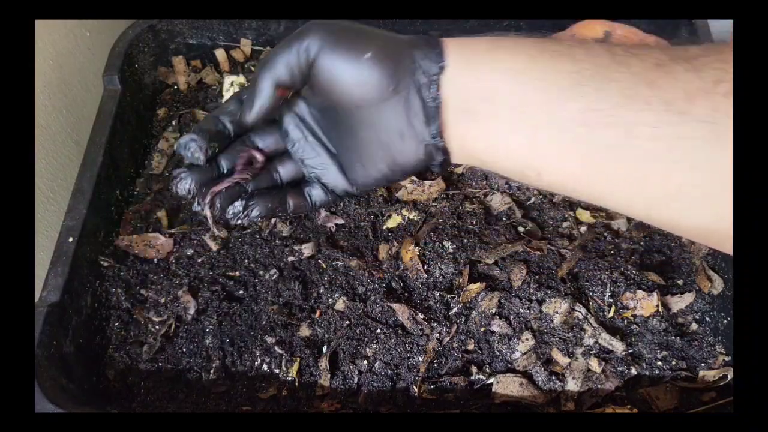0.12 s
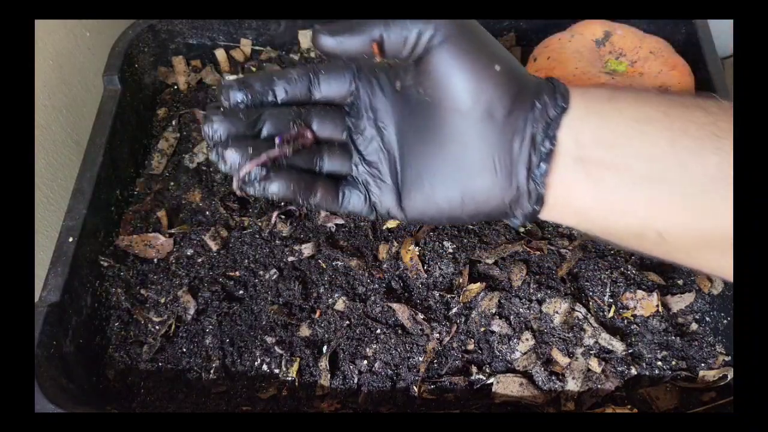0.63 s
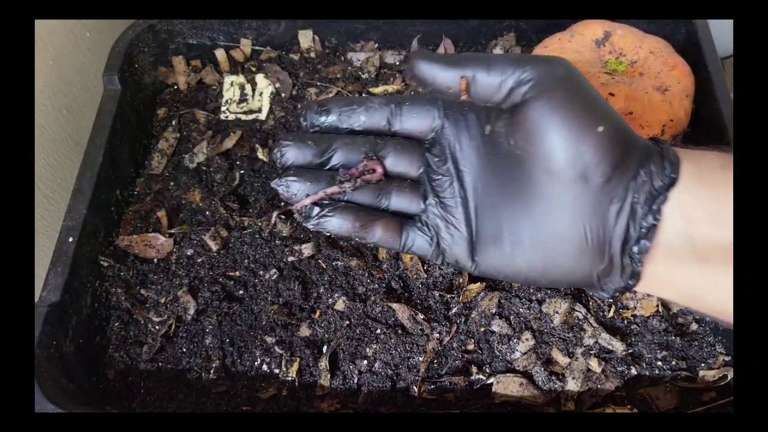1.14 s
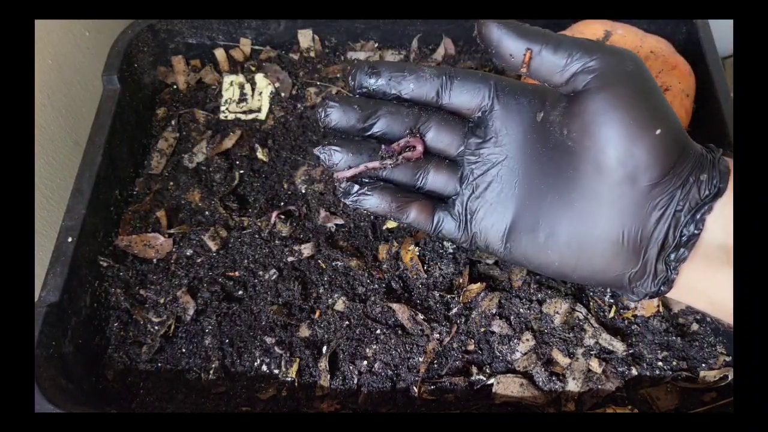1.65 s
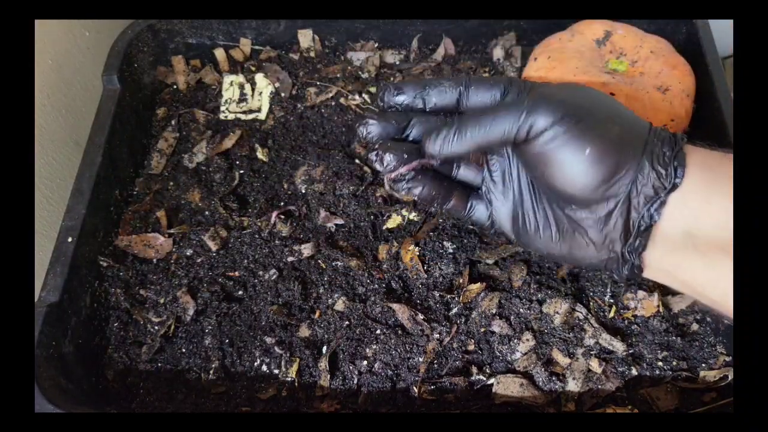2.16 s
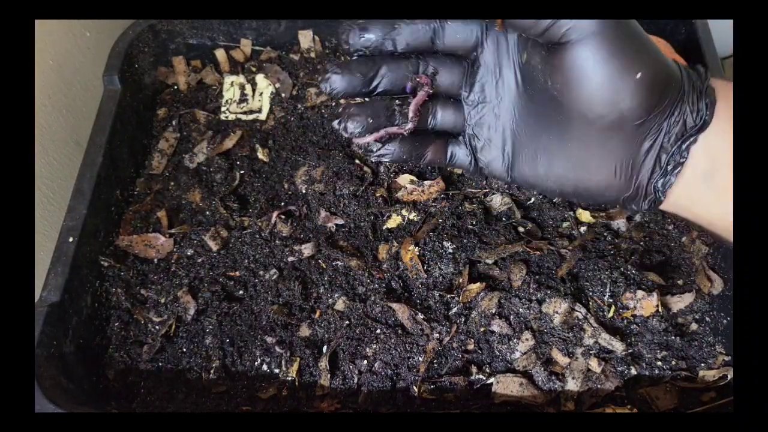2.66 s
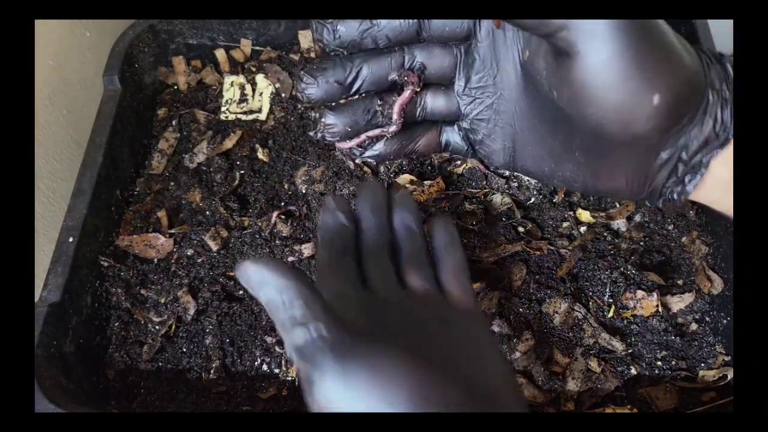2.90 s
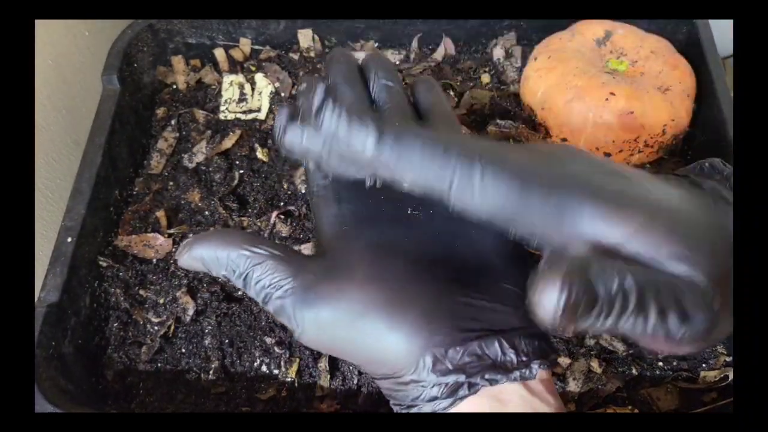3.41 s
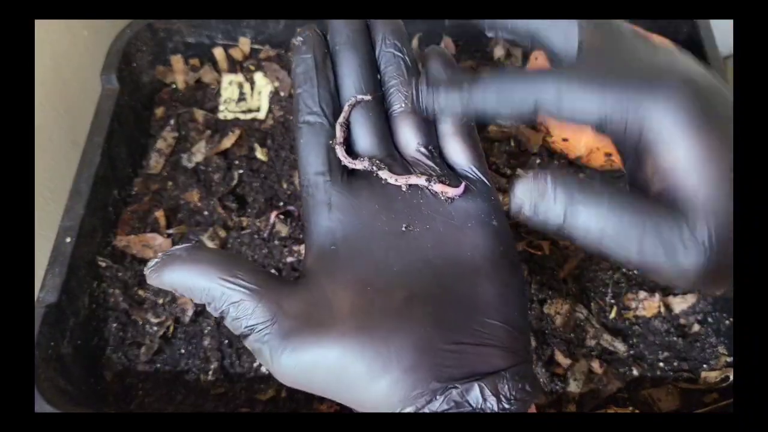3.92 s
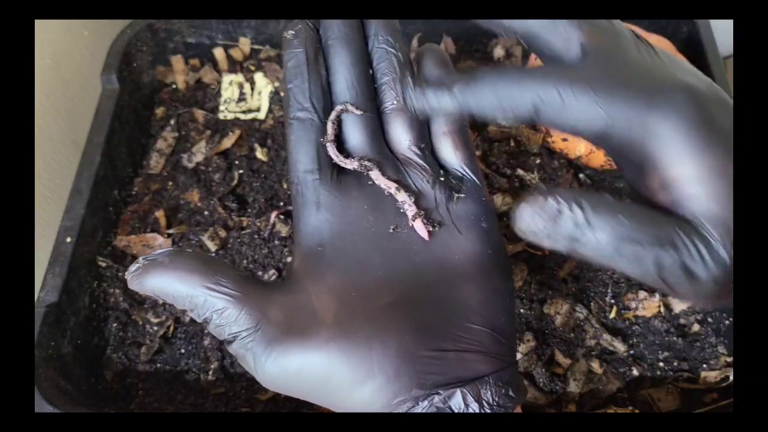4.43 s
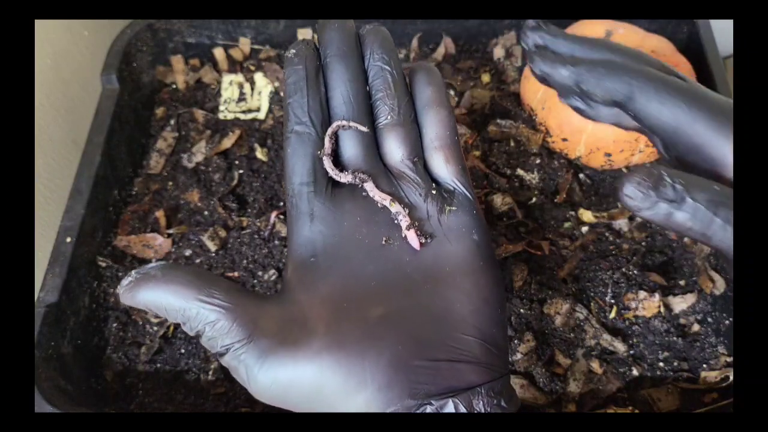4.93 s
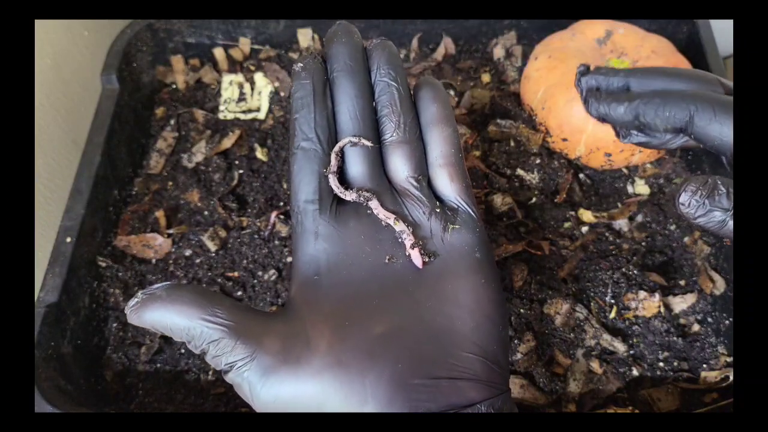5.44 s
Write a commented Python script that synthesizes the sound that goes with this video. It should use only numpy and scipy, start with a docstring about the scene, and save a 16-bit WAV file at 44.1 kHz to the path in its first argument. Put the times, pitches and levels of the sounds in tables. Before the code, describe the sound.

Gloved hands work over a compost bin, heard close in stereo. The start is mostly hum, low rumble and airy hush, with barely audible rubber touches and a far, hoarse falling chirp repeated several times. Around the middle come crisp little crackles, dull pops and dry squeaky rubs of thin gloves, then just the drone again, with a brief second low hum beneath.

```python
"""Over a compost bin, gloved hands pass a worm from palm to palm. The thin rubber rustles and rubs in
clumps of tiny noisy slips, and its folds snap very softly as clicks with short noise bursts. A motor (sine
multiples of its turn rate) drones through the walls, with a brief second hum late on. Beneath lie a wavering
boom, a low rumble of resonant noise and a broad, patchy hush. A far bird chirps in falling, trilled tones."""
import sys
import numpy as np
from scipy import signal
from scipy.fft import rfft, irfft
from scipy.io import wavfile
from scipy.ndimage import uniform_filter1d, map_coordinates

SR = 44100
rng = np.random.default_rng(int(sys.argv[2]) if len(sys.argv) > 2 else 0)


def wrap_up_sound(samples):
    """Save the sound to the file named by the first command line argument, as 16-bit audio."""
    columns = np.atleast_2d(samples).T
    # keep every value between -1 and 1, then stretch to whole-number steps
    tamed = np.clip(columns, -1, 1)
    steps = np.round(tamed * 32767).astype(np.int16)
    wavfile.write(sys.argv[1], SR, steps)


def undo_db(level):
    """Turn decibels back into plain size, where 20 dB means ten times bigger."""
    steps = np.asarray(level, float) / 20
    return 10 ** steps


N = 245592   # length in samples


def rms_one(x):
    """Scale to rms 1."""
    return x / np.sqrt(np.mean(x ** 2) + 1e-20)


def in_time(rows):
    """Columns of a table after its time column, one value per sample."""
    s, *columns = np.transpose(rows)
    return [np.interp(np.arange(N) / SR, s, column) for column in columns]


def at_hz(rows, hz):
    """Columns of a table after its frequency column, read on a log-frequency axis."""
    points, *columns = np.transpose(rows)
    return [np.interp(np.log(hz + 1), np.log(points), column) for column in columns]


def coloured(x, spectrum):
    """Give a flat sound a spectrum; rms 1."""
    hz = np.fft.rfftfreq(N, 1 / SR)
    return rms_one(irfft(rfft(x) * undo_db(at_hz(spectrum, hz)[0]), N))


def resonate(x, hz, width_hz):
    """Two-pole resonance, gain 1 on top."""
    r = np.exp(-np.pi * width_hz / SR)
    numerator = np.array([1, 0, -1]) * (1 - r * r) / 2
    return signal.lfilter(numerator, [1, -2 * r * np.cos(2 * np.pi * hz / SR), r * r], x)


def band(x, low_hz, high_hz):
    """Butterworth band-pass."""
    edges_hz = [low_hz, min(high_hz, SR / 2.1)]
    return signal.sosfilt(signal.butter(2, edges_hz, "band", fs=SR, output="sos"), x)


def drift(rate):
    """Slow chance curve through knots of spread 1, two knots per cycle of the rate in Hz."""
    knots = rng.standard_normal(400)
    return map_coordinates(knots, [np.arange(N) / SR * 2 * rate + 5], order=3)


def echoes(x, t60):
    """Dense diffuse tail, unrelated in the two channels, energy 1."""
    t = np.arange(SR) / SR
    tail = rng.standard_normal((2, SR)) * undo_db(-60 * t / t60)
    tail = tail / np.sqrt(np.sum(tail ** 2, axis=1, keepdims=True))
    return signal.fftconvolve(np.atleast_2d(x), tail, axes=1)[:, :N]


def patchy(x, patchy_db):
    """Small patches of time and pitch grow louder or softer by chance."""
    _, _, z = signal.stft(x, nperseg=2048)
    field = rng.standard_normal(z.shape[1:])
    field = uniform_filter1d(field, size=3, axis=0)   # across pitch
    field = uniform_filter1d(field, size=6, axis=1)   # across time
    return signal.istft(z * undo_db(patchy_db * rms_one(field)), nperseg=2048)[1][:, :N]


# rubber slides on rubber: (start t/s, hold t/s, relative level/dB,
# hollow ring level/dB and thin ring level/dB, both added to the stroke's level)
STROKE_ROWS = [(0.017, 0.11, -94.5, 1.5, -1), (0.308, 0.21, -98.5, -5, 9), (1.747, .1, -105, 3, -3),
               (2.048, 0.089, -99, 1, 7), (2.492, 0.11, -100, 18, 10), (3.009, 0.1, -78, 0, -2),
               (3.108, .1, -88.5, 4, 7.5), (3.232, 0.2, -81.5, -10, -12), (3.466, .11, -80.5, 4, -9),
               (3.63, 0.073, -83.5, -8, -20), (3.725, .15, -99, 12, -2), (3.955, 0.058, -77.5, 4, -7),
               (4.059, 0.11, -80.5, 4, -14), (4.235, 0.091, -79, 9.5, 0), (4.352, 0.045, -87, 18.5, 4),
               (4.41, 0.02, -81.5, 19, 16), (4.655, 0.12, -102, 1, -13), (4.938, 0.16, -103, 16, -14)]


def strokes():
    """Gains of the rustle, the hollow ring and the thin ring: each stroke rises, holds and dies away."""
    rise_db_per_s, fall_db_per_s = 302, 319.5
    t = np.arange(N) / SR
    s, hold, db, hollow_db, thin_db = np.transpose(STROKE_ROWS)[:, :, None]
    rise_db = rise_db_per_s * np.maximum(s - t, 0)
    fall_db = fall_db_per_s * np.maximum(t - s - hold, 0)
    gain = undo_db(db - rise_db - fall_db)
    return [np.sqrt(np.sum((gain * undo_db(part_db)) ** 2, axis=0)) for part_db in (0, hollow_db, thin_db)]


# spectrum of the rustle: (f/Hz, relative level/dB per Hz)
RUBBER_SPECTRUM = [(1500, -23), (3000, -13), (5000, -0.5), (6000, 6), (9000, -2), (11500, 8.5),
                   (13500, 1.5), (15500, 5)]
# ring of the cupped palm: (f/Hz, width f/Hz, relative level/dB)
PALM_RING = [(3550, 460, 0)]
# rings of the stretched film: (f/Hz, width f/Hz, relative level/dB)
FILM_RINGS = [(6840, 390, 2), (7580, 450, 6.5)]


def rub(rustle, hollow_gain, thin_gain):
    """Dense slips in clumps: a broad rustle that also rings the cupped palm and the stretched film."""
    slips_per_s = 3000
    sizes = undo_db(2.5 * np.minimum(rng.exponential(1, (2, N)), 5)) * rng.choice([-1, 1], (2, N))
    slips = rms_one(sizes * (rng.random((2, N)) < slips_per_s / SR))
    slips = slips * undo_db(1.9 * drift(25))   # clumps
    broad = coloured(slips, RUBBER_SPECTRUM) * undo_db(8.5)
    hollow = rms_one(sum(undo_db(db) * resonate(slips, hz, width) for hz, width, db in PALM_RING))
    thin = rms_one(sum(undo_db(db) * resonate(slips, hz, width) for hz, width, db in FILM_RINGS))
    return rustle * broad + hollow_gain * hollow + thin_gain * thin


def small_snaps(rustle, count):
    """Rows like the loud folds, at chance moments, their strength following the rustle under them."""
    over_rustle_db, spread_db, t60_s = 19, 5, .012
    at, spread = rng.integers(0, N, count), rng.standard_normal((count, 3))
    rustle_db = 20 * np.log10(rustle[at] + 1e-9)[:, None]
    parts_db = rustle_db + over_rustle_db + spread_db * spread
    return np.column_stack([at / SR, parts_db, np.full(count, t60_s)])


# the loudest folds: (t/s, bright part level/dB, dull part level/dB, middle part level/dB, t60 t/s);
# levels are the start of each burst ahead of its band filter
LOUD_FOLDS = [(0.476, -85, -79, -65, 0.018), (.5024, -76, -84, -60, 0.042), (2.064, -83, -74, -62, 0.027),
              (2.385, -79, -83, -64, .03), (3.0045, -67, -62, -49.5, .03), (3.049, -64, -42, -48.5, 0.011),
              (3.077, -59.5, -53, -54, 0.017), (3.2036, -60, -62, -60, .015), (3.242, -58, -70, -72, .03),
              (3.3103, -57, -68, -66, .02), (3.3528, -52, -64, -67, 0.025), (3.3725, -51, -66, -59, 0.027),
              (3.377, -39.5, -60, -53, 0.018), (3.418, -41, -28, -40, 0.008),
              (3.4205, -60.5, -35.5, -46.5, 0.088), (3.475, -70, -62, -49.5, 0.037),
              (3.492, -64, -45, -51, 0.058), (3.609, -64, -70, -70, .015), (3.6432, -58, -68, -66, .02),
              (3.959, -52, -52, -68, 0.048), (4.0474, -68, -62, -51, 0.013),
              (4.0836, -55, -66, -51.5, .015), (4.144, -58, -95, -64, 0.024), (4.424, -62, -52, -48, 0.034),
              (4.441, -63, -51, -52.5, 0.018)]
# bands of the bright, dull and middle parts: (low f/Hz, high f/Hz)
FOLD_BANDS = [(8300, 13000), (3470, 4000), (4430, 7600)]


def snaps(rustle):
    """Each fold, loud or small, lets go with a click and a burst that dies at once."""
    folds = np.vstack([LOUD_FOLDS, small_snaps(rustle, count=140)])
    t, parts = np.arange(SR // 10) / SR, np.zeros((3, N + SR))
    puffs = rng.standard_normal((len(folds), len(t)))
    puffs[:, 0] = 5.0   # the first release is the hardest
    for puff, (s, *parts_db, t60) in zip(puffs, folds):
        at = round(s * SR)
        fading_db = np.array(parts_db)[:, None] - 60 * t / max(t60, .004)
        parts[:, at:at + len(t)] += puff * undo_db(fading_db)
    return sum(band(part[:N], *edges) for part, edges in zip(parts, FOLD_BANDS))


# the motor's steady tones: (multiple of the turn rate, rms level/dB around which each flutters)
MOTOR_TONES = [(4, -62.5), (7, -73), (9, -67.5), (11, -79)]
# the strong fifth multiple: (t/s, rms level/dB around which it flutters)
MOTOR_FIFTH_LEVEL = [(0.0, -54.5), (0.08, -52), (1.46, -50.5), (1.5, -59.5), (1.88, -46.5), (2.26, -62),
                     (2.43, -52), (3.13, -52), (3.16, -61), (4.03, -51), (4.17, -59), (4.65, -50.5),
                     (4.78, -64), (5.07, -51), (5.29, -56.5), (5.57, -52)]


def motor():
    """Sines at multiples of a slightly unsteady turn rate, each fluttering in level."""
    turn_hz = 33.51 * (1 + 0.0019 * drift(0.96))
    turns = 2 * np.pi * np.cumsum(turn_hz) / SR
    tones = undo_db(in_time(MOTOR_FIFTH_LEVEL)[0] + 2.5 * drift(5)) * np.sin(5 * turns)
    for k, level_db in MOTOR_TONES:
        phase = rng.uniform(0, 2 * np.pi)
        tones = tones + undo_db(level_db + 4.1 * drift(3)) * np.sin(k * turns + phase)
    return np.sqrt(2) * tones   # sine peak from rms


def late_hum():
    """A brief second hum: a low tone, slightly unsteady in level, fades in and out."""
    start_s, end_s, fade_s, hz, rms_db = 4.3, 5.4, 0.13, 90, -51
    t = np.arange(N) / SR
    gate = np.clip(np.minimum(t - start_s, end_s - t) / fade_s + .5, 0, 1)
    return np.sqrt(2) * gate * undo_db(rms_db + 1.6 * drift(3)) * np.sin(2 * np.pi * hz * t)


# low boom, the centre of its wavering: (t/s, pitch f/Hz, rms level/dB)
BOOM_PATH = [(0.0, 64.94, -46.5), (0.26, 65.15, -38.5), (0.42, 65.42, -46.5), (0.62, 59.32, -39.5),
             (0.94, 62.02, -45.5), (1.16, 59.02, -47), (1.43, 60.13, -39.5), (1.58, 66.9, -50),
             (1.78, 62.4, -38), (2.11, 63.1, -52), (2.17, 60.27, -45.5), (2.5, 60.36, -38),
             (2.76, 56.94, -62), (2.99, 60.03, -43.5), (3.24, 58.84, -44), (4.33, 58.4, -43.5),
             (4.36, 57.4, -55), (4.65, 63.53, -48), (4.76, 58.55, -59), (4.87, 59.37, -44),
             (5.41, 58.42, -50.5), (5.57, 62.35, -44)]


def boom():
    """One low sine that wavers in pitch and level."""
    waver_db, waver_hz, wavers_per_s = 1.5, 0.76, 5.0
    hz, level_db = in_time(BOOM_PATH)
    hz = hz + waver_hz * drift(wavers_per_s)
    gain = undo_db(level_db + waver_db * drift(wavers_per_s))
    return np.sqrt(2) * gain * np.sin(2 * np.pi * np.cumsum(hz) / SR)


# resonances of the low rumble: (f/Hz, width f/Hz, rms level/dB ahead of the port balance)
RUMBLE_RESONANCES = [(26.3, 47, -59.5), (51.9, 4.5, -54), (72.76, 11, -51), (88, 24, -56), (99.3, 28, -61),
                     (126.5, 10, -61.5), (165, 33, -57.5), (197.7, 28, -64.5), (237.4, 18, -74.5),
                     (278.5, 33, -67), (311.2, 23, -65.5)]


def rumble():
    """Low noise rings in a few room resonances."""
    hz = np.fft.rfftfreq(N, 1 / SR)
    power = 0
    for centre_hz, width_hz, level_db in RUMBLE_RESONANCES:
        shape = 1 / (1 + (2 * (hz - centre_hz) / width_hz) ** 2) ** 2
        power = power + undo_db(level_db) ** 2 * shape / np.mean(shape)
    return irfft(rfft(rng.standard_normal((3, N))) * np.sqrt(power), N)


# spectrum of the broad hush: (f/Hz, relative level/dB per Hz)
HUSH_SPECTRUM = [(200, -33.5), (340, -8.5), (400, -6.5), (520, -14), (616, -10), (900, -8), (1080, -11.5),
                 (1360, -8.5), (1610, -18), (2140, -21), (2610, -24.5), (3000, -34), (3700, -38.5),
                 (4720, -44.5), (5290, -48.5), (7800, -54.5), (9000, -75.5), (16000, -78)]
# gain of the hush from 2.5 to 5 kHz: (t/s, level/dB)
HUSH_UPPER_SWELL = [(0, 2), (.5, 6), (1.8, 0.5), (3, 2), (3.6, 3.5), (4.2, 2), (4.7, 2.5), (5.57, 3.5)]


def hush():
    """Smooth far noise in patches; its upper part swells slowly."""
    air = coloured(patchy(rng.standard_normal((3, N)), patchy_db=2.0), HUSH_SPECTRUM)
    air = air / np.std(band(air[0], 400, 16000)) * undo_db(-55.5)   # rms above 400 Hz, before the swell
    return air + band(air, 2500, 5000) * (undo_db(in_time(HUSH_UPPER_SWELL)[0]) - 1)


# far bird: (t/s, level/dB ahead of envelope and echoes, start f/Hz, end f/Hz, length t/s, hoarseness 0-1)
CHIRP_ROWS = [(0.106, -68, 6430, 5570, 0.18, 0.27), (0.822, -70.5, 6320, 5600, 0.21, 0.76),
              (1.523, -73, 6330, 5450, .14, 0.3), (2.179, -67, 6300, 5430, 0.12, 0.23),
              (5.12, -83, 4860, 4580, 0.21, 0.67)]


def bird():
    """A trilled, hoarse falling note, heard mostly through its echoes."""
    trill_hz, warble_hz, yard_t60_s = 62, 120, .5   # the trill swings pitch (by warble_hz) and level
    out, t = np.zeros(N), np.arange(N) / SR
    trill = 2 * np.pi * trill_hz * t
    rasp = rms_one(band(rng.standard_normal(N), 40, 420))
    for s, db, start_hz, end_hz, length, hoarse in CHIRP_ROWS:
        u = np.clip((t - s) / length, 0, 1)   # progress through the note
        hz = end_hz + (start_hz - end_hz) * (1 - u) ** 2.0 + warble_hz * np.cos(trill)
        voice = (1 - hoarse) * (1 + 0.37 * np.sin(trill)) + hoarse * rasp
        envelope = undo_db(db) * np.sin(np.pi * u ** 1.1)
        out += envelope * voice * np.sin(2 * np.pi * np.cumsum(hz) / SR)
    return echoes(out, yard_t60_s) + .6 * out


# the two microphone ports: (f/Hz, likeness 0-1, left lead/rad, left minus right level/dB)
PORT_FIELD = [(49.7, 0.98, 0, -1.8), (178, 0.99, 0.08, 1.5), (327, 0.78, 0.67, -1), (418, 0.52, 1.37, -4),
              (660, 0.48, 3.5, -2), (1180, 0.73, 2.5, -0.1), (1510, 0.6, 4, 0), (2160, .05, 3, 0.5),
              (2780, 0.1, 4, 1), (16000, 0.24, 2, -4)]


def ports(shared, own):
    """A diffuse field at two ports: alike in the bass, phase-turned in the middle, little related on top."""
    alike, lead, balance_db = at_hz(PORT_FIELD, np.fft.rfftfreq(N, 1 / SR))
    alike, side = np.clip(alike, 0, 1), np.array([[1], [-1]])   # left, right
    common = np.sqrt(alike) * rfft(shared) * np.exp(.5j * lead * side)
    field = common + np.sqrt(1 - alike) * rfft(own)
    return irfft(field * undo_db(balance_db * side / 2), N)


def scene():
    """Far noise arrives as a diffuse field; rubs lean right, direct snaps lean left."""
    far = hush() + rumble()
    drone_db = np.array([[-.2], [.2]]) + .5 * drift(3.7) * np.array([[1], [-1]])   # wandering balance
    field = ports(far[0], far[1:]) + late_hum() + (motor() + boom()) * undo_db(drone_db)
    gains = strokes()
    snap = snaps(gains[0])
    bin_echo = undo_db(-11) * echoes(snap, t60=.06)
    hands = rub(*gains) + snap * [[.8], [.1]] + bin_echo
    return field + hands * undo_db(np.array([[-1.8], [1.8]])) + bird()


def roll_off(x):
    """The treble ends steeply here."""
    return signal.sosfilt(signal.butter(12, 15710, fs=SR, output="sos"), x)


def record(dry):
    """The microphones add their own hiss, then a steep low-pass cuts the top."""
    hiss_db, top_hz = -92, 16100   # hiss rms before the cut; 40 dB down from top_hz
    heard = dry + undo_db(hiss_db) * rng.standard_normal(dry.shape)
    mix = signal.sosfilt(signal.cheby2(14, 40, top_hz, fs=SR, output="sos"), heard)
    return roll_off(mix)


dry = scene()
out = record(dry)
wrap_up_sound(out)
```